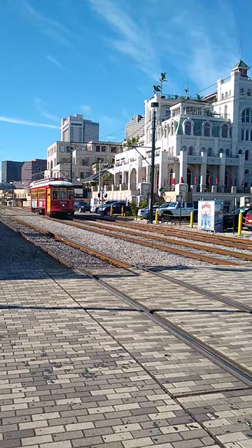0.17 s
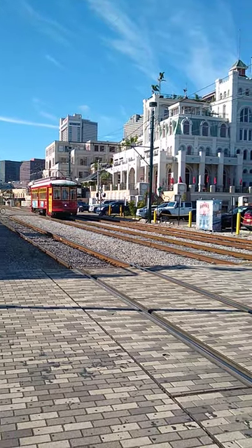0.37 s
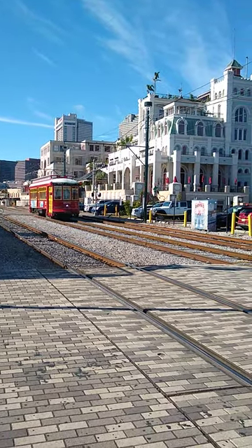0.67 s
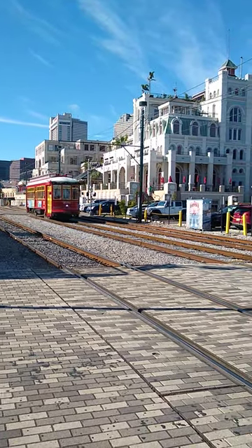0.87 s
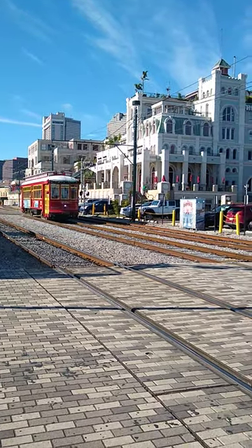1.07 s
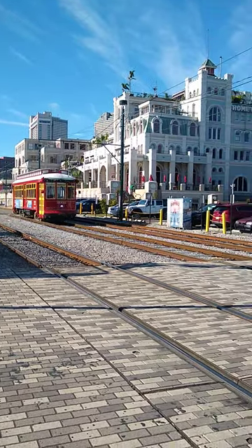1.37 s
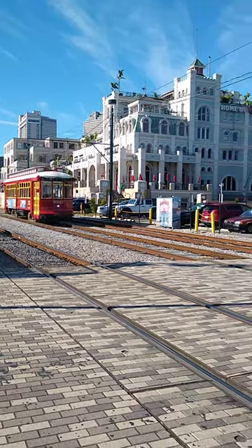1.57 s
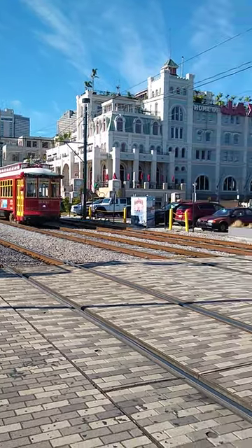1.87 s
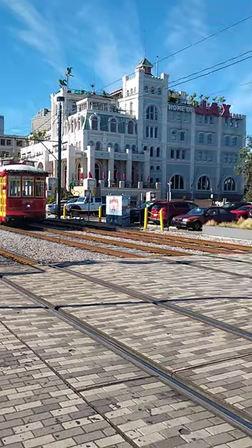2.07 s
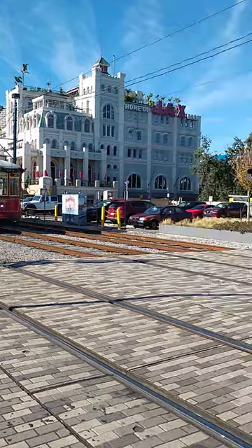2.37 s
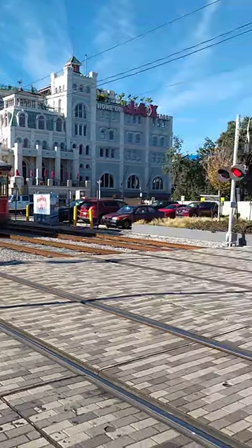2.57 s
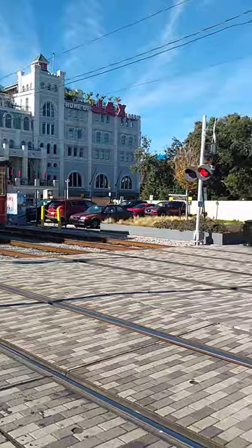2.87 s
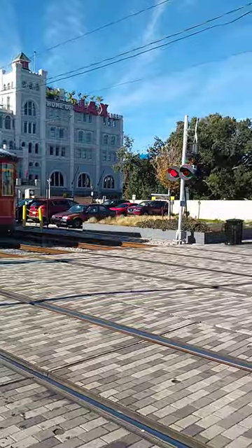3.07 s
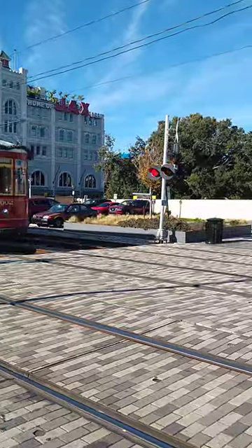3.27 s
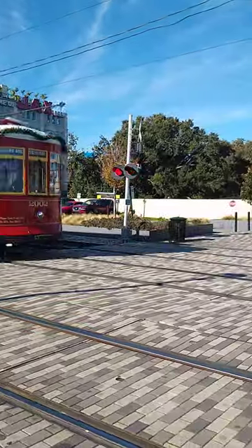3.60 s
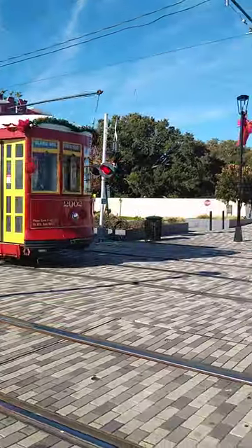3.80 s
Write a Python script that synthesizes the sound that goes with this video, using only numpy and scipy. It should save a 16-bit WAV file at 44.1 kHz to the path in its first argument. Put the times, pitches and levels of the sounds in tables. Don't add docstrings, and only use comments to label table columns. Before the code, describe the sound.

A streetcar approaches over rails at an open paved crossing, its rumble rising into dense thuds and metallic knocks; wind buffets the handheld phone at first, and a sleeve rubs midway.

```python
import sys
import numpy as np
from scipy import signal
from scipy.fft import rfft, irfft, next_fast_len
from scipy.io import wavfile
from scipy.ndimage import uniform_filter1d

SR = 44100
rng = np.random.default_rng(int(sys.argv[2]) if len(sys.argv) > 2 else 0)


def waveform_to_disk(signal):
    frames = np.transpose(np.atleast_2d(signal))
    scaled = np.clip(frames, -1, 1) * 32767
    samples = np.round(scaled).astype(np.int16)
    wavfile.write(sys.argv[1], SR, samples)


def convert_level_to_amplitude(level_db):
    exponent = np.asarray(level_db, float) / 20
    return 10 ** exponent


N = 173754
LENGTH = next_fast_len(N + 4096)
HZ = np.fft.rfftfreq(LENGTH, 1 / SR)
T = np.arange(N) / SR


def evened(x):
    return x / np.sqrt(np.mean(x ** 2) + 1e-20)


def read(points, hz):
    f, v = np.transpose(points)
    return np.interp(np.log(hz + 1), np.log(f + 1), v)


def curve(points, t):
    return np.interp(t, *np.transpose(points))


def humps(rows, hz):
    return sum(db / (1 + (2 * (hz - f) / w) ** 2) for f, w, db in rows)


def colour(x, gain):
    return irfft(rfft(x, LENGTH) * gain, LENGTH)[..., :N]


def slow(top_hz):
    return evened(colour(rng.standard_normal(N), 1 / (1 + (HZ / top_hz) ** 4)))


def shaped(x, field_db, patchy_db, wide, long):
    hz, t, z = signal.stft(x, SR, nperseg=512, noverlap=384)
    patch = rng.standard_normal(z.shape[-2:])
    patch = uniform_filter1d(patch, wide, axis=0)
    patch = evened(uniform_filter1d(patch, long, axis=1))
    z = z * convert_level_to_amplitude(field_db(hz[:, None], t) + patchy_db * patch)
    return signal.istft(z, SR, nperseg=512, noverlap=384)[1][..., :N]


def steadied(x):
    band = colour(x, (HZ > 190) & (HZ < 420))
    strength = uniform_filter1d(band ** 2, size=500) / np.var(band)
    even = band / (strength + .1) ** .3
    return x - band + convert_level_to_amplitude(-2.5) * np.std(band) * evened(even)


def streetcar():
    # (time [s], distance [m])
    approach = [(0, 65), (1, 31), (1.6, 27.7), (2.2, 17.2), (2.8, 10.7), (3.15, 9.4), (3.45, 7.5),
                (3.94, 5.28)]
    # (frequency [Hz], level [dB])
    rolling = [(60, -35), (200, -11.5), (600, -12), (1000, -20), (2100, -22), (3300, -41.5), (6000, -50.5),
               (15000, -38.5)]
    # (frequency [Hz], width [Hz], lift [dB])
    wheel = [(265, 84, 9), (330, 77, 8.5), (498, 90, 3), (566.6, 25, 6.5), (827, 180, 5.5), (1247, 47, 8),
             (1504, 145, 6), (1660, 52, 5), (1960, 170, 3.5), (2354, 200, 5.5), (2947, 85, 6),
             (3666, 54, 8.5), (4200, 1010, 17)]
    bumps_per_s, bump_spread_db, bump_share, bump_top_hz = 300, 3.0, .5, 1200
    level_db, air_db_per_m_khz = -16, 0.1923

    bumps = convert_level_to_amplitude(bump_spread_db * np.minimum(rng.exponential(1, (2, N)), 3))
    bumps = bumps * (rng.random((2, N)) < bumps_per_s / SR)
    bumps = bumps * rng.choice([-1., 1.], (2, N))
    bumps = colour(evened(bumps) * convert_level_to_amplitude(0.1 * slow(25)), 1 / (1 + (HZ / bump_top_hz) ** 2))
    drive = bump_share * bumps + (1 - bump_share) * rng.standard_normal((2, N))
    ring = steadied(evened(colour(drive, convert_level_to_amplitude(read(rolling, HZ) + humps(wheel, HZ)))))

    def air_loss(hz, t):
        return -air_db_per_m_khz * curve(approach, t) * hz / 1000

    nearness = 7 / curve(approach, T)
    return convert_level_to_amplitude(level_db) * nearness * shaped(ring, air_loss, 1.02, wide=3, long=20)


def city():
    # (frequency [Hz], level [dB])
    traffic = [(60, -13), (250, -1), (500, -29), (1100, -14.5), (2100, -13.5), (3300, -42.5), (6000, -50),
               (15000, -52.5)]
    # (frequency [Hz], width [Hz], lift [dB])
    street = [(281, 65, 7.1), (778, 143, 13.6), (1274, 74, 8.3), (1700, 105, 5.4), (3880, 260, 5.1),
              (4216, 1040, 17.4)]
    hum = evened(colour(rng.standard_normal((2, N)), convert_level_to_amplitude(read(traffic, HZ) + humps(street, HZ))))
    return convert_level_to_amplitude(-32) * shaped(hum, lambda hz, t: 0 * hz * t, 2.38, wide=3, long=16)


def wind():
    # (centre [s], level [dB], width [s])
    gusts = [(0.048, -13, 0.039), (0.116, -11.5, 0.023), (0.244, -12, 0.22), (0.374, -31, 0.019),
             (0.424, -17, 0.026), (0.527, -10.5, 0.093), (0.668, -16.5, 0.051), (0.744, -19, 0.091),
             (0.883, -24, 0.024), (0.938, -22, 0.17), (1.122, -28.5, 0.11), (1.217, -26.5, 0.082),
             (1.317, -29, 0.049), (1.796, -27, 0.079), (1.931, -26.5, 0.088), (1.985, -20, 0.024),
             (2.12, -21, 0.028), (2.165, -19, 0.025), (2.245, -21, 0.18), (2.315, -30, 0.028),
             (2.405, -18.5, 0.055), (2.493, -20, 0.037), (2.741, -30, 0.071), (2.903, -24, 0.045),
             (3.088, -27, 0.16), (3.477, -25.5, 0.083), (3.68, -21.5, 0.15), (3.896, -28, 0.074)]
    # (time [s], level [dB])
    lull = [(0, -28.5), (.65, -19.5), (.8, -42), (1.5, -50), (1.9, -32), (2.5, -29), (2.65, -39),
            (3.3, -44), (3.7, -33), (3.94, -34)]
    # (frequency [Hz], level [dB])
    tone = [(15, -64), (73, 2.5), (158, -1), (314, -9.5), (380, -13.5), (462, -30), (704, -37.5),
            (1000, -60)]
    # (time [s], peak [dB], width [ms])
    pop_rows = [
        (0.048, -12, 1.5),
        (0.111, 0, 1.5),
        (0.232, 2.5, 1.45),
        (.25, -13, 0.7),
        (0.498, -1, 0.86),
        (0.532, -6, 1.1),
        (0.54, -6, 0.38),
    ]
    level = convert_level_to_amplitude(curve(lull, T))
    for s, db, width in gusts:
        level = np.maximum(level, convert_level_to_amplitude(db - 56 * ((T - s) / width) ** 2))
    level = uniform_filter1d(level, size=300)

    fall_db = 30 * np.maximum(np.log2(HZ / 1000 + 1e-9), 0)
    raw = colour(rng.standard_normal((2, N)), convert_level_to_amplitude(read(tone, HZ) - fall_db))
    low = colour(raw, 1 / (1 + (HZ / 260) ** 4))
    high = (raw - low) / np.std(low)
    strength = abs(uniform_filter1d(low ** 2, size=1200)) + 0.046 * np.var(low)
    low = low / strength ** 0.46
    push = level * (evened(low) + 1.05 * high * (level / convert_level_to_amplitude(-13.0)) ** 1.5)

    start, peak_db, width_ms = np.transpose(pop_rows)[:, :, None]
    u = (T - start) * 1000 / width_ms
    pops = (convert_level_to_amplitude(peak_db) * (1 - u ** 2) * np.exp(-u ** 2 / 2)).sum(axis=0)
    own = 0.1 * push[1] + 0.54 * colour(push[1], HZ ** 2 / (HZ ** 2 + 300 ** 2))
    return np.array([1.066 * push[0] + own - pops, -.94 * push[0] + own + 0.39 * pops])


def sleeve():
    # (start [s], end [s], level [dB], rise [s], fall [s], brightness [dB])
    strokes = [(0.045, 0.23, -52.5, 0.013, 0.029, 0), (0.268, 0.392, -54.5, 0.016, 0.037, 1),
               (0.392, 0.423, -51, 0.018, 0.033, -2), (1.781, 1.803, -41.5, 0.1, 0.03, 0),
               (1.844, 2.16, -43, 0.094, 0.11, 1.5), (2.207, 2.26, -39.5, 0.033, 0.099, -2),
               (2.42, 2.95, -54.5, 0.041, .05, -2), (2.726, 2.785, -46.5, .02, .02, 1.5),
               (2.81, 2.82, -47, .01, 0.024, -1), (2.991, 3.028, -43.5, 0.016, 0.062, -1.5),
               (3.175, 3.223, -48, 0.047, 0.044, -3.5), (3.296, 3.498, -52, 0.057, .1, -1.5)]
    # (frequency [Hz], level [dB])
    cloth = [(1000, 10.5), (4000, 5.5), (5500, 1), (7000, 2), (9800, -1), (10700, 1.5), (13900, 0.5),
             (15500, -0.5)]
    snaps_per_s, snap_spread_db, snap_share = 250, 3.5, 0.13

    hiss = rng.standard_normal((2, N)) * convert_level_to_amplitude(0.63 * slow(400) + 1.07 * slow(21))
    snaps = convert_level_to_amplitude(snap_spread_db * np.minimum(rng.exponential(1, N), 4))
    snaps = snaps * (rng.random(N) < snaps_per_s / SR)
    hiss = hiss * (1 + snap_share * evened(signal.lfilter([1], [1, -.97], snaps)))

    def rubbing(hz, t):
        power = 1e-12
        for start, end, db, rise, fall, bright_db in strokes:
            off = np.maximum(start - t, 0) / rise + np.maximum(t - end, 0) / fall
            fade_db = 14 * off ** 2 / (1 + 0.58 * off)
            tilt_db = bright_db * np.tanh((hz - 8500) / 2500)
            power = power + convert_level_to_amplitude(db - fade_db + tilt_db) ** 2
        return 10 * np.log10(power)

    return shaped(evened(colour(hiss, convert_level_to_amplitude(read(cloth, HZ)))), rubbing, 0.51, wide=6, long=24)


def grit():
    # (time [s], peak [dB])
    ticks = [(.2613, -38), (.3167, -37), (1.6571, -36), (2.5222, -30), (2.5691, -30), (2.635, -38),
             (2.6998, -35), (2.8085, -33), (2.9672, -34), (2.9991, -32), (3.1901, -29)]
    fade = sum(convert_level_to_amplitude(db) * (T > s) * np.exp(-np.maximum(T - s, 0) / .0012) for s, db in ticks)
    bright = HZ / (HZ + 2500) / (1 + HZ / 6000) * 1.44
    out = colour(fade * rng.standard_normal(N), bright)
    return np.array([out, np.roll(out, 90)])


def motor():
    hum_hz, waver, level_db, centre_s, span_s = 283, .008, -38, 2.0, .5
    turn = 2 * np.pi * np.cumsum(hum_hz * (1 + waver * slow(12.9))) / SR
    gear = np.sin(2 * turn) * convert_level_to_amplitude(2.8 * slow(24))
    rough = convert_level_to_amplitude(4.5) * np.sin(.91 * turn + 1.25 * slow(29.5)) * convert_level_to_amplitude(2.6 * slow(19))
    return convert_level_to_amplitude(level_db - 4.2 * ((T - centre_s) / span_s) ** 4) * (gear + rough)


def thuds():
    # (time [s], peak [dB], ring [Hz])
    thud_rows = [(1.511, -27, 326), (1.542, -26, 280), (1.6, -24, 245), (1.643, -23.5, 272),
                 (1.669, -27, 229), (1.694, -23.5, 246), (1.732, -18, 318), (1.785, -25, 235),
                 (1.816, -21, 246), (1.857, -15.5, 259), (1.913, -23, 251), (1.95, -15.5, 245),
                 (1.992, -33, 315), (2.046, -23, 257), (2.109, -24, 288), (2.133, -18.5, 254),
                 (2.235, -16.5, 280), (2.269, -17.5, 283), (2.294, -18, 265), (2.347, -18, 250),
                 (2.402, -19.5, 303), (2.451, -15.5, 248), (2.479, -12.5, 333), (2.559, -20, 322),
                 (2.611, -19, 301), (2.685, -11.5, 266), (2.746, -15, 278), (2.797, -18, 296),
                 (2.836, -13.5, 269), (2.916, -28, 275), (2.951, -13.5, 288), (2.993, -10.5, 255),
                 (3.109, -13.5, 340), (3.145, -25, 298), (3.185, -10, 264), (3.244, -12, 260),
                 (3.332, -10.5, 460), (3.395, -7.5, 241), (3.419, -7.5, 262), (3.519, -11.5, 286),
                 (3.566, -15, 338), (3.598, -10, 288), (3.631, -8.5, 293), (3.655, -9.5, 305),
                 (3.692, -17, 304), (3.718, -9.5, 323), (3.801, -8.5, 277), (3.874, -9.5, 340),
                 (3.452, -7.5, 302),
        (3.466, -12, 300),
        (3.534, -8.5, 330),
        (3.669, -10, 299),
        (3.730, -4, 330),
        (2.626, -15, 405),
    ]
    cycles, trim_db, overtone_db, overtone_ratio = 3.73, -2, -7, 1.9
    out = np.zeros(N)
    for s, db, hz in thud_rows:
        u = np.maximum(T - s, 0) * hz / cycles
        turn = 2 * np.pi * cycles * u
        ring = np.sin(turn) + convert_level_to_amplitude(overtone_db) * np.sin(overtone_ratio * turn)
        out += convert_level_to_amplitude(db + trim_db) * np.e * 3 * u * np.exp(-3 * u) * ring
    return np.array([out, np.roll(out, 60) / 2])


def squeaks():
    # (time [s], level [dB], pitch [Hz], width [s])
    squeak_rows = [
        (1.72, -55, 5400, .02),
        (2.815, -53, 5500, .012),
        (3.53, -41, 3740, 0.02),
    ]
    out = np.zeros(N)
    for s, db, hz, width in squeak_rows:
        whistle = np.sin(2 * np.pi * hz * T + .6 * slow(90))
        out += convert_level_to_amplitude(db - 7.3 * ((T - s) / width) ** 2) * whistle
    return np.array([out, np.roll(out, 60) / 2])


def rail_joints():
    # (time [s], peak [dB], start pitch [Hz])
    joints = [
        (2.669, -17, 1630),
        (2.674, -15.5, 1230),
        (2.707, -15.5, 1660),
        (2.716, -17, 1440),
        (2.724, -25, 1180),
        (2.73, -22.5, 1310),
        (2.751, -30, 1200),
        (2.833, -14.5, 774),
        (3.487, -18, 856),
        (3.74, -13, 930),
    ]
    cycles, pitch_fall = 5.4, 0.41
    out = np.zeros(N)
    for s, db, hz in joints:
        u = np.maximum(T - s, 0) * hz / cycles
        turn = 2 * np.pi * cycles * (u - pitch_fall * np.minimum(u, 1) ** 2 / 2)
        out += convert_level_to_amplitude(db) * 2.64 * 3 * u * np.exp(-3 * u) * np.sin(turn)
    return np.array([out, np.roll(out, 90)])


def ports(pair):
    # (frequency [Hz], phase [rad])
    lead_points = [(400, -0.69), (1300, 0), (2150, -3), (3000, -4.5), (4200, -10), (4700, -7.5),
                   (5100, -15), (6100, -16)]
    # (frequency [Hz], likeness [0-1])
    alike = [(300, 0.98), (450, 0.76), (760, 1), (1600, .93), (2300, 0.98), (3200, 0.3), (4400, 0.78),
             (6800, 0.25)]
    # (frequency [Hz], level [dB])
    sides = [(260, -1.5), (480, 3), (800, 0.5), (2000, -1.5), (3000, 1.5), (5500, -1.5), (9000, 12),
             (14000, 3.5)]
    top_hz, top_start_rad, top_delay_s = 6930, -9, 0.000396
    same = np.clip(read(alike, HZ), 0, 1)
    top_lead = top_start_rad + 2 * np.pi * top_delay_s * (HZ - top_hz)
    lead = np.where(HZ < top_hz, read(lead_points, HZ), top_lead)
    lean = convert_level_to_amplitude(read(sides, HZ) / 2)
    right = np.exp(-1j * lead) / lean
    shared = colour(pair[0], same * right)
    scattered = colour(pair[1], np.sqrt(1 - same ** 2) * right)
    return np.array([colour(pair[0], lean), shared + scattered])


def self_noise():
    # (frequency [Hz], level [dB])
    hiss_tone = [(5000, -30), (8000, -9), (11000, 0), (15500, 0)]
    return convert_level_to_amplitude(-76) * evened(colour(rng.standard_normal((2, N)), convert_level_to_amplitude(read(hiss_tone, HZ))))


def scene():
    car = streetcar() + motor() + thuds() + squeaks() + rail_joints() + grit()
    return ports(car + city() + sleeve()) + wind() + self_noise()


def top_cut(x):
    return signal.sosfilt(signal.butter(12, 15500, fs=SR, output="sos"), x)


def record(dry):
    # (frequency [Hz], width [Hz], lift [dB])
    phone = [(9200, 1750, -4.5), (10800, 1100, 2.5), (13600, 3000, 4.5)]
    # (frequency [Hz], width [Hz], depth [dB], negative lifts)
    mid_gaps = [(4396, 186, 22), (5630, 640, -10)]
    # (frequency [Hz], width [Hz], depth [dB])
    side_gaps = [(1080, 130, 20), (5700, 290, 6.8)]
    ceiling, low_cut_hz, top_hz = 0.67, 58.6, 15480
    dry = ceiling * np.tanh(dry / ceiling)
    low_cut = 1 / np.sqrt(1 + (low_cut_hz / (HZ + 1)) ** 8)
    dry = colour(dry, convert_level_to_amplitude(humps(phone, HZ)) * (HZ < top_hz) * low_cut)

    def gap_gain(rows):
        return convert_level_to_amplitude(-sum(db * np.exp(-((HZ - f) / w) ** 4) for f, w, db in rows))

    mid = colour((dry[0] + dry[1]) / 2, gap_gain(mid_gaps))
    side = colour((dry[0] - dry[1]) / 2, gap_gain(side_gaps))
    return top_cut(np.array([mid + side, mid - side]))


dry = scene()
out = record(dry)
waveform_to_disk(out)
```